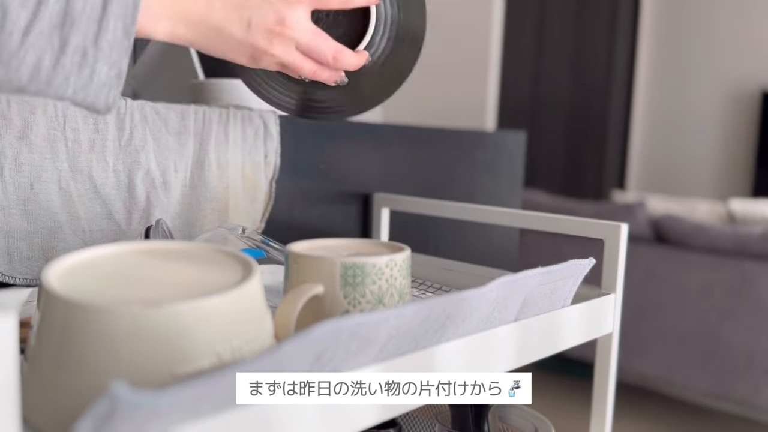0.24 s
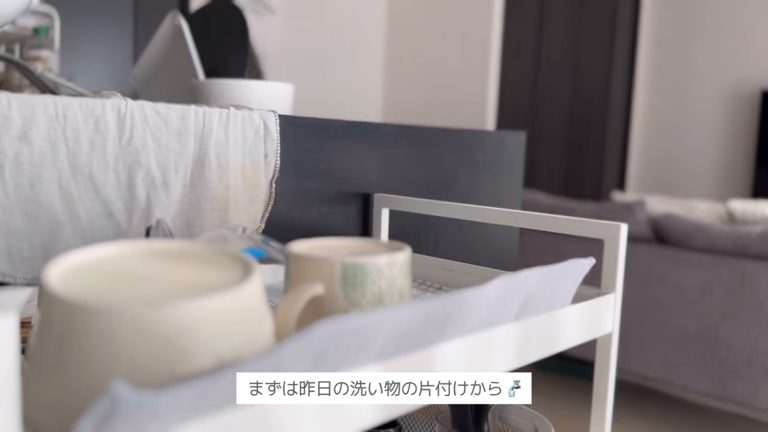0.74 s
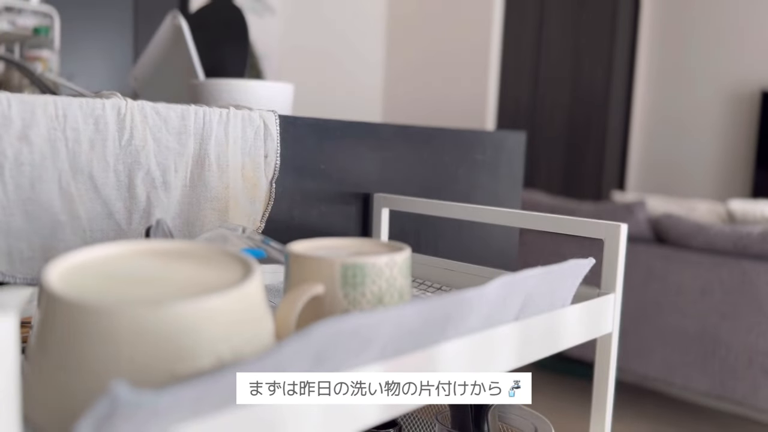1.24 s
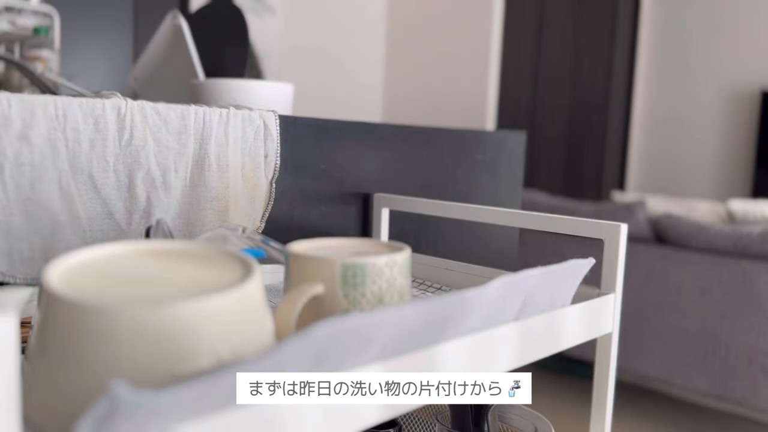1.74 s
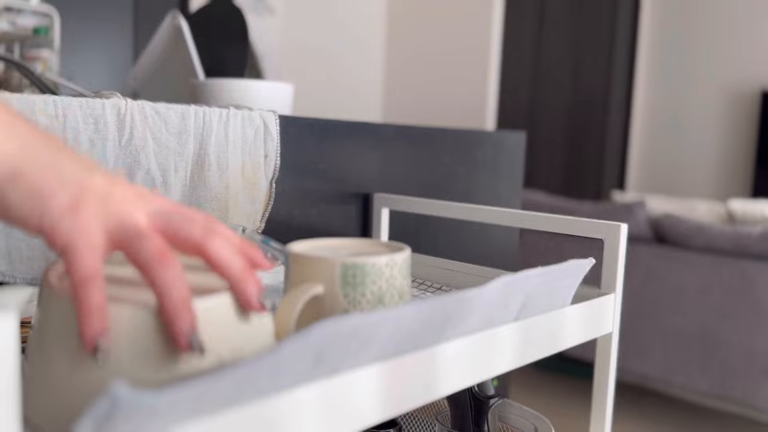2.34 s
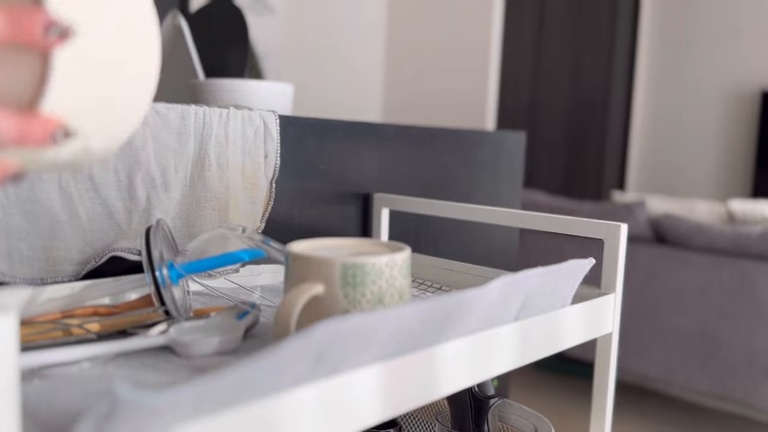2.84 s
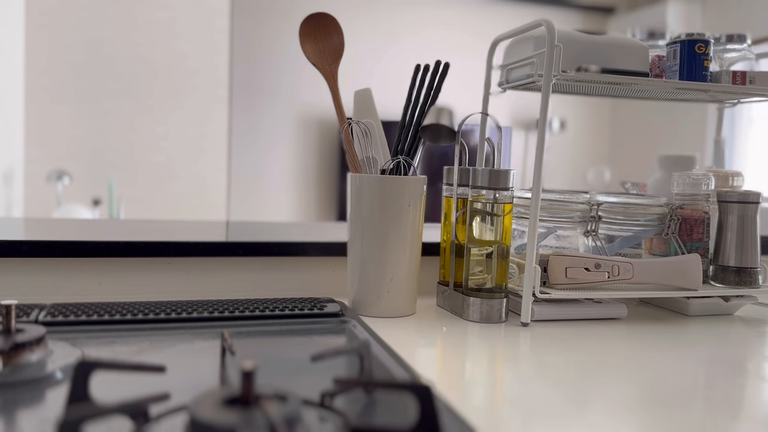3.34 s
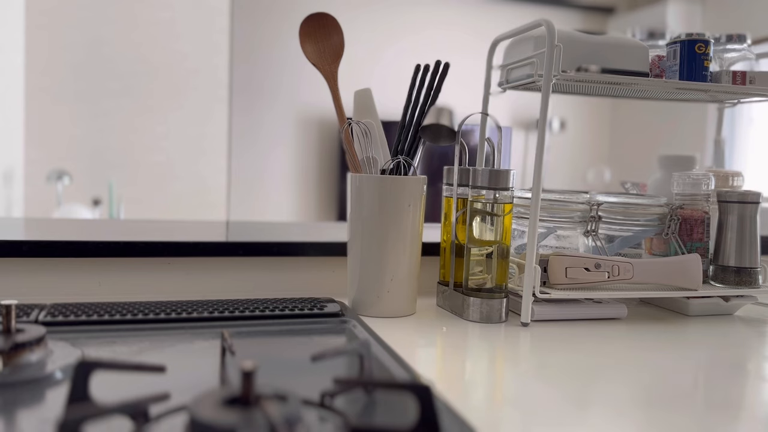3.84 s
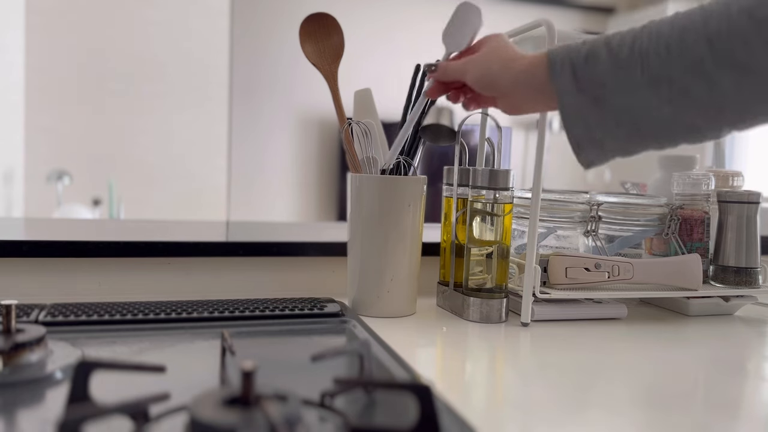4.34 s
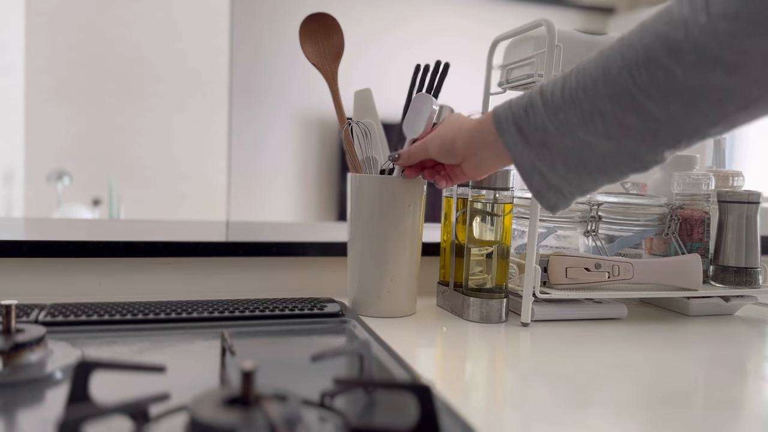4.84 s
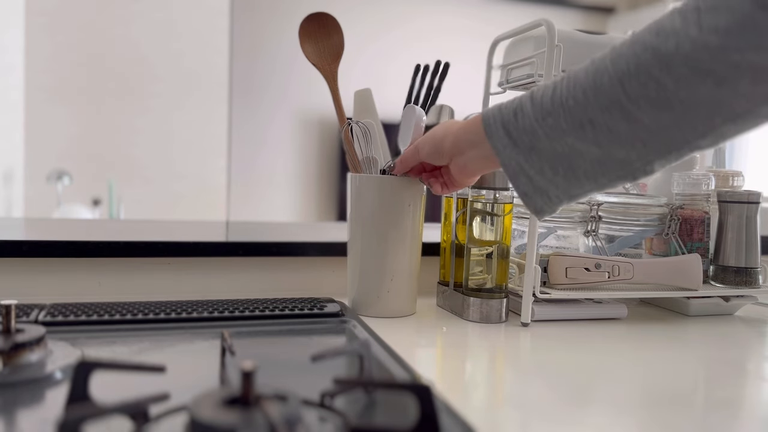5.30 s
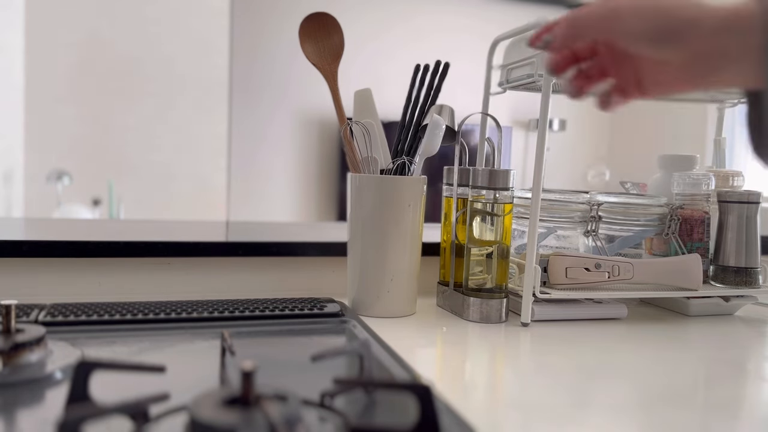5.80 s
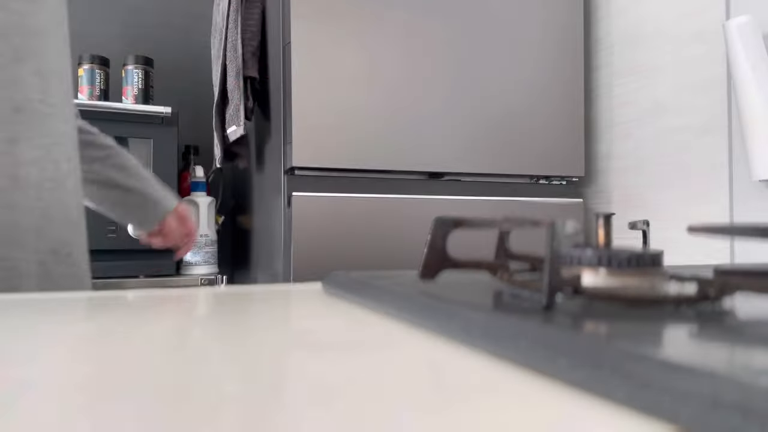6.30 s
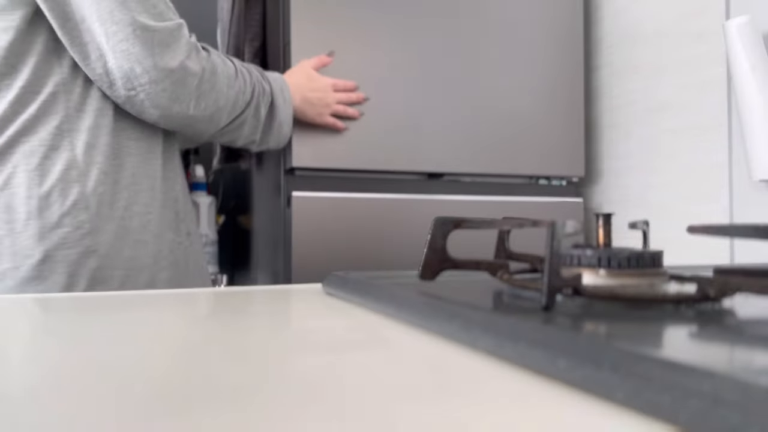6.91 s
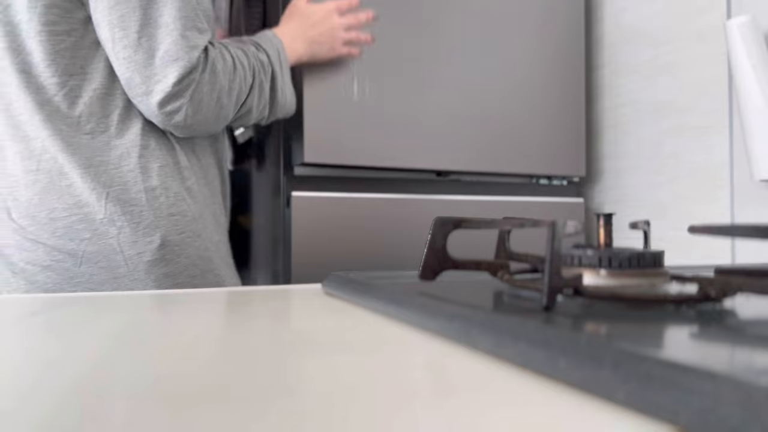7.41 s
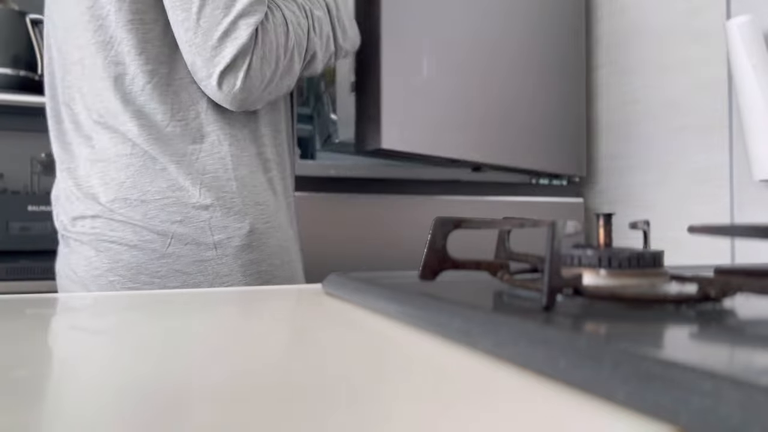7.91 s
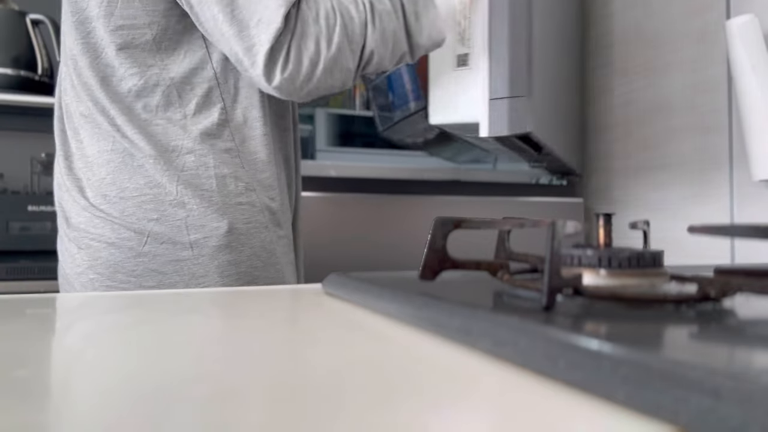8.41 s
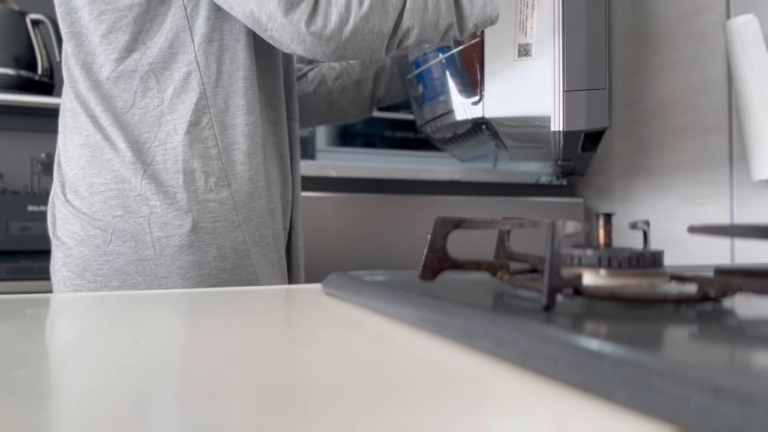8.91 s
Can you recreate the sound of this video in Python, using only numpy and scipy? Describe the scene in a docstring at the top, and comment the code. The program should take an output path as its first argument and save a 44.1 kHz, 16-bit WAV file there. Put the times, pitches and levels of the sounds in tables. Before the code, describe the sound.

A hard cabinet knock rattles stacked dishes in a bare kitchen, then a bowl lifts, cutlery clinks into a jar, and a fridge opens and is loaded.

```python
"""Washed dishes are put away in a bare, ringing kitchen: cabinet knocks across the room, a bowl lifted off a rack,
cutlery clinking into a ceramic jar, then a fridge pulled open and loaded, over the steady hum of the flat.
Blows are clicks that ring decaying modes and set off short noise bursts; slides are dense grit in several bands.
Both feed a noise-built room tail. Air pushes, hum, hiss, a whine and faint swishes are shaped noise."""
import sys
import numpy as np
from scipy import signal
from scipy.io import wavfile

SR = 44100
rng = np.random.default_rng(int(sys.argv[2]) if len(sys.argv) > 2 else 0)


def transcribe(u):
    """Save the signal u as a 16-bit wav file named by the first command-line argument.

    u: samples, shape (n,) or (channels, n), limited to [-1, 1]; the rate is SR.
    q: integer samples, one column per channel.
    """
    v = np.clip(np.atleast_2d(u).T, -1, 1)
    q = np.round(v * 32767).astype(np.int16)
    wavfile.write(sys.argv[1], SR, q)


N = 403515  # length in samples

# Bands of the noisy layers of knocks and slides: (low [Hz], high [Hz])
THUMP_HZ, WOOD_HZ, EDGE_HZ, TICK_HZ = (60, 330), (270, 1600), (1150, 4600), (4300, 15500)

# Resonances of thin panels and of wood: (frequency [Hz], level [dB], decay t60 [s])
PANEL_MODES = [(92.1, -10.5, 0.34), (142.5, 6.5, 0.11), (204.3, -3, 0.077), (261.7, -3, 0.2)]
WOOD_MODES = [(335.4, 6.8, 0.14), (497, 0.7, 0.1), (613, 5.9, 0.052), (791, 8.7, 0.034), (982, 3.7, 0.046),
              (1163, 2.8, 0.049), (1490, 5, 0.025)]
# Knocks on cabinet, rack, door seal and fridge: (time [s], wood level [dB], thump re wood [dB],
# edge re wood [dB], favoured wood pitch [Hz], left over right [dB])
CABINET_KNOCKS = [(1.073, -20.5, -10.5, -4.5, 1110, 1.6), (1.395, -40, -14.5, -6, 470, 2.5),
                  (1.659, -54, -9, -9, 640, 2.1), (1.949, -52, -13.5, -33, 855, 3.3),
                  (2.365, -51.5, -25, -15, 970, 3.1), (2.883, -47.5, 2, -13, 714, 1.3),
                  (6.803, -48.5, -4, -13, 1050, 1)]
RACK_KNOCKS = [(2.128, -50, -4, 2, 930, 8.5), (2.591, -43.5, 5.5, -0.5, 415, 3.5),
               (2.959, -52, -2, 3.5, 390, 11), (3.155, -54, 14.5, 1, 353, 3.5),
               (3.272, -40.5, -16, 3.5, 1450, -3), (3.329, -56, -3, 16, 1210, -0.5),
               (3.361, -60.5, -12, 18, 388, 4.5), (5.94, -49.5, -31, -9.5, 940, 2)]
SEAL_KNOCKS = [(7.125, -35, 10.4, -9.5, 526, -0.49), (7.256, -47, 2.4, -6.5, 805, 0.65),
               (7.3, -42.5, 12.4, -11.5, 1070, -1.6)]
FRIDGE_KNOCKS = [(7.357, -43, 10, -32, 400, -7), (7.421, -44, 4.5, -20, 437, 2),
                 (7.449, -42, 7.5, -34, 1140, -8), (7.667, -43.5, -11, -26, 536, 5),
                 (7.696, -47.5, 11.5, -12.5, 510, 5), (7.727, -51.5, 6, -20, 587, -1),
                 (8.312, -68, -21, -1, 1204, 1), (8.558, -41.5, -8, -36, 805, -2),
                 (8.644, -45.5, -5.5, -17, 943, -4), (8.776, -48, 0, -17, 580, -6),
                 (8.815, -26, -3.5, -22.5, 680, -4.5), (8.831, -35, 5, -20, 352, 4),
                 (8.924, -34, -0.5, -9, 740, -4), (8.959, -31.5, -5, -14, 1070, 1.5),
                 (9.066, -54.5, 10, -14, 775, 6), (9.133, -39, -31, -13.5, 1130, -2.5)]
# How each body is heard: (direct [dB], room [dB], tick re edge [dB], snap [dB])
ACROSS_ROOM, WIRE_RACK = (-4.5, 11.5, -9, -4), (0.1, 1.9, -2.5, -3)
RUBBER_SEAL, PLASTIC_SHELF = (-2.5, 0.7, -0.3, -1), (1.8, -2.5, -17.5, -10.5)


def fridge_rocking():
    """Something loose in the fridge door rocks at a steady beat, each knock weaker; returns knock rows."""
    start_s, every_s = 7.795, .1393
    level_db, loss_db = -51.5, 1  # first knock, drop per knock
    return [(start_s + k * every_s, level_db - k * loss_db, -6, -35, 584, 0) for k in range(6)]


def knocks():
    """A blow sets off panel thump, wood modes, a short snap, an edge crack and a bright tick.
    What reaches the walls comes from all sides of the body, so its modes blur into noise bands.
    Returns direct sound and room feed."""
    bodies = [(CABINET_KNOCKS, ACROSS_ROOM), (RACK_KNOCKS, WIRE_RACK), (SEAL_KNOCKS, RUBBER_SEAL),
              (FRIDGE_KNOCKS + fridge_rocking(), PLASTIC_SHELF)]
    rows = sorted(row + heard for body_rows, heard in bodies for row in body_rows)
    s, wood, thump, edge, wood_hz, pan, direct_db, room_db, tick, snap = np.transpose(rows)

    near = wood + direct_db
    panel_ring = ring(blows(s, near + thump - 6, pan / 2), PANEL_MODES)
    # the wood ring builds up over about a millisecond
    wood_ring = ring(blows(s, near + 1.0, pan), WOOD_MODES, favour_hz=wood_hz, falloff_db=12, rise_s=.0013)
    direct = soft(panel_ring, hz=394) + soft(wood_ring, hz=2500)
    direct += crack(blows(s, near + edge + 8, pan), EDGE_HZ, t60=0.064, channels=2)
    direct += crack(blows(s, near + edge + tick + 6, pan), TICK_HZ, t60=0.026)
    direct += crack(blows(s, near + snap, pan), (1300, 3400), t60=0.02)

    far = wood + room_db
    feed = crack(blows(s, far + thump + 19, pan / 2), THUMP_HZ, t60=0.13)
    feed += crack(blows(s, far + 12, pan), WOOD_HZ, t60=0.06, channels=2)
    feed += crack(blows(s, far + edge + 7, pan), EDGE_HZ, t60=0.059, channels=2)
    room_tick = crack(blows(s, far + edge + tick + 3, pan), TICK_HZ, t60=0.032)
    feed += signal.lfilter([1], [1, -.9], room_tick)  # ticks sound duller in the room tail
    return np.array([direct, feed])


# Resonances of the stacked dishes: (frequency [Hz], level [dB], decay t60 [s])
STACK_MODES = [(1335, 0, .2), (1675, -2, .2), (2259, -4, .12), (2722, -5, .12), (3840, -8, .15),
               (5090, -8, .12), (6350, -12, .15)]


def stack():
    """The first cabinet knock jolts the stacked dishes into ringing; returns direct sound and room feed."""
    first_s, pan_db = CABINET_KNOCKS[0][0], CABINET_KNOCKS[0][-1]
    rings = ring(blows(np.array([first_s]), -33.5, pan_db), STACK_MODES, rise_s=.003)
    return np.array([rings, rings])


# Touches on the bowl: (time [s], ring drive [dB], clack drive [dB], favoured pitch [Hz],
# fall-off away from it [dB per octave], left over right [dB])
BOWL_TOUCHES = [(2.4568, -53.5, -39, 10200, 18, 4.7)]
# Resonances of the bowl: (frequency [Hz], level [dB], decay t60 [s])
BOWL_MODES = [(4200, -3, .05), (6675, -2, .4), (10300, 0, .12), (13280, -2, .4), (14700, -3, .2)]


def bowl():
    """A touch rings the bowl's modes under a clack; returns direct sound and room feed."""
    return clinks(BOWL_TOUCHES, BOWL_MODES, clack_room_db=4.0, ring_room_db=-5)


# Resonances of the hand-held rim and of the rack's wires: (frequency [Hz], level [dB], decay t60 [s])
RIM_MODES = [(1185, 1, .06), (1890, -4, .02), (2815, 10, .45), (4900, -8, .03)]
WIRE_MODES = [(4250, -8, .03), (4720, -1, .02), (5250, -2, .012)]
SLIPS_PER_S = 900  # nominal rate of a dragged edge


def rub():
    """The rim sticks and slips in step with its own modes, so they sing; pressure on the rack stiffens the rim,
    so the pitches sag as it lifts. Later the bowl scrapes over the wires. Returns direct sound and room feed."""
    start_s = 2.516
    span = slice(int(start_s * SR), int((start_s + .5) * SR))
    drag = slips(start_s, length=.052, level_db=-49, fade_db=3)
    force = np.abs(drag[:, span]) * SR / SLIPS_PER_S
    # pressure builds to a peak, eases, then drops away
    pressed = np.interp(np.arange(N)[span] / SR, (2.518, 2.54, 2.553, 2.568), [0.5, 0.96, 0.67, 0.0089])
    stiffening_hz = 810  # added by the rack at pressure 1
    rings = np.zeros((2, N))
    for hz, db, t60 in RIM_MODES:
        r = decay(t60)
        pitch_hz = np.sqrt(hz ** 2 + stiffening_hz ** 2 * pressed)
        tone = np.sin(2 * np.pi * np.cumsum(pitch_hz) / SR)
        strength = signal.lfilter([1 - r], [1, -r], force * pressed)
        rings[:, span] += from_db(db) * tone * strength
    scrape = slips(start=3.008, length=0.17, level_db=-55, fade_db=26)
    rings += ring(scrape, WIRE_MODES, rise_s=0.00092)
    return np.array([rings, from_db(-8) * rings])


def slips(start, length, level_db, fade_db):
    """Uneven slips of a dragged edge, a little to the left, fading over the drag."""
    s = np.unique((start + length * rng.random(int(SLIPS_PER_S * length))).round(4))
    drive_db = level_db - fade_db * (s - start) / length + 3 * rng.standard_normal(len(s))
    return blows(s, drive_db, 3 + 0 * s) * rng.choice([-1, 1], N)


# Cutlery on the jar: (time [s], ring drive [dB], clack drive [dB], favoured pitch [Hz],
# fall-off away from it [dB per octave], left over right [dB])
JAR_CLINKS = [(4.4198, -29.5, -29, 3000, 5.5, 2), (4.4646, -33, -36, 4930, 10.5, 7.5),
              (4.6749, -49, -44, 4100, 27, 5.5), (4.7134, -29, -48, 2219, 264, 2),
              (4.7508, -59, -54, 13100, 51, 6), (5.019, -69, -64, 6390, 13, 9),
              (5.1347, -55, -53.5, 2670, 12, 8), (5.1832, -60, -73, 2300, 14, 4.5),
              (5.4121, -46.5, -42.5, 12550, 8, 5.5), (5.7066, -41, -27.5, 8500, 2, 4.5)]
# Resonances of the ceramic jar: (frequency [Hz], level [dB], decay t60 [s])
JAR_MODES = [(1560, -5, 0.022), (2220, -5.5, 0.061), (2283, 4, 0.052), (2500, -11, 0.044), (3237, 3, 0.043),
             (3594, -5.5, 0.022), (4180, -11.5, .04), (4810, -6.5, 0.022), (5540, -8, 0.16),
             (6170, 1.5, 0.05), (7990, -4.5, 0.17), (10100, -19, .03), (10105, -4.5, 0.03), (11390, 3, .06),
             (11800, -5, 0.06), (13170, -2, .06)]


def cutlery():
    """Cutlery strikes set the ceramic jar ringing; returns direct sound and room feed."""
    return clinks(JAR_CLINKS, JAR_MODES, clack_room_db=-1.5, ring_room_db=-12.0)


# A steel utensil drops in and bounces: (time [s], ring drive [dB], clack drive [dB], favoured pitch [Hz],
# fall-off away from it [dB per octave], left over right [dB])
STEEL_BOUNCES = [(5.7075, -35, -30.5, 4460, 5.8, 5.7), (5.745, -55, -70, 2150, 20, 4),
                 (5.766, -53, -70, 2150, 24, 4)]
# Resonances of the utensil: (frequency [Hz], level [dB], decay t60 [s])
STEEL_MODES = [(2153, -6, .025), (3316, -7, .15), (3924, -5, .03), (4172, -5, .03), (4985, 0, .04),
               (6557, -4, .04), (8317, -5, .07), (9889, -3, .04), (10710, -1, .03), (12820, -3, .04)]


def steel_utensil():
    """The drop and its bounces ring the utensil's own modes; returns direct sound and room feed."""
    return clinks(STEEL_BOUNCES, STEEL_MODES, clack_room_db=-2.0, ring_room_db=-8)


def clinks(rows, modes, clack_room_db, ring_room_db):
    """Each clink peaks over a few milliseconds and rings the modes around its favoured pitch,
    plus a dry clack with a dull body; returns direct sound and room feed."""
    # a click and a weaker one 4.6 ms later: ring 8 dB and clack 2.5 dB down
    weaker = np.array(rows) + [0.0046, -8, -2.5, 0, 0, 0]
    clicks = sorted(rows + list(map(tuple, weaker)))
    s, ring_db, clack_db, favour_hz, falloff_db, pan = np.transpose(clicks)
    clack = crack(blows(s, clack_db, pan), (1100, 11000), t60=0.012)
    clack += crack(blows(s, clack_db - 5.5, pan), WOOD_HZ, t60=0.021)  # dull body
    rings = ring(blows(s, ring_db, pan), modes, favour_hz=favour_hz, falloff_db=falloff_db, rise_s=0.00023)
    return np.array([clack + rings, from_db(clack_room_db) * clack + from_db(ring_room_db) * rings])


# Strokes of sliding on rack and fridge door:
# (start [s], hold [s], rumble level [dB], rasp level [dB], edge re rasp [dB])
SLIDE_STROKES = [(2.11, 0.18, -77, -57, 1.5), (2.556, 0.027, -70, -60.5, 5), (2.632, 0.36, -61, -68.5, 2),
                 (2.86, 0.085, -46, -76, -2), (2.956, 0.12, -52.5, -53, -2.5),
                 (3.134, 0.054, -45, -55.5, -7.5), (3.265, 0.11, -73, -49.5, -12),
                 (3.39, 0.026, -53, -47.5, -32), (6.781, 0.025, -42.5, -48, -11),
                 (7.113, 0.018, -30, -37, -13), (7.372, 0.025, -37, -53, -27),
                 (7.43, 0.13, -52, -56.5, -38), (7.628, 0.12, -43.5, -59, -23),
                 (8.88, 0.054, -45, -62, -20), (8.932, 0.012, -38, -39, -30)]


def slides():
    """Dense uneven grit under the stroke shakes panels and wood and rasps above them."""
    attack_s, release_db_per_s = 0.022, 207
    t, levels = np.arange(N) / SR, 0
    for start, hold, rumble_db, rasp_db, edge_db in SLIDE_STROKES:
        release = from_db(-release_db_per_s * np.maximum(t - start - hold, 0))
        shape = np.clip((t - start) / attack_s, 0, 1) * release
        tick_db = -13 + 3 * edge_db  # the top drops faster than the edge on a dull stroke
        layers_db = [rumble_db, rasp_db, rasp_db + edge_db, rasp_db + tick_db]
        levels = levels + np.outer(from_db(layers_db), shape)
    thump, wood, edge, tick = levels
    grains = rng.random((2, N)) < 1800 / SR  # about 1800 per second in each ear
    grit = grains * rng.standard_normal((2, N)) * from_db(3 * drift(25))
    rumble = soft(ring(grit[[0, 0]], PANEL_MODES, struck=False), hz=410.0)
    moving = thump * rms_one(rumble)
    moving += wood * rms_one(band(grit, *WOOD_HZ))
    moving += edge * rms_one(band(grit, *EDGE_HZ))
    return moving + tick * rms_one(band(grit, *TICK_HZ))


# Doors shove the air of the room: (time [s], drive level [dB])
DOOR_PUSHES = [(1.079, -8.5), (3.0, -23), (3.3, -19), (7.13, -7), (7.33, -7.5)]


def air_pushes():
    """Each shove of air is a deep puff of low noise that dies slowly."""
    s, level_db = np.transpose(DOOR_PUSHES)
    return crack(blows(s, level_db, 0 * s), (34, 72), t60=0.82)


# Reverb time of the kitchen: (frequency [Hz], decay t60 [s])
KITCHEN_T60 = [(60, 0.62), (250, 0.6), (1000, 0.51), (3000, 0.42), (8000, 0.46), (14000, 0.14)]


def kitchen(x):
    """Dense reflections that build up in under a millisecond and die band by band."""
    t = np.arange(SR) / SR
    tail = stereo_bands(SR, lambda hz: from_db(-60 * t / at_hz(KITCHEN_T60, hz)))
    tail *= 1 - np.exp(-t / 0.00022)
    tail /= np.sqrt(np.sum(tail ** 2) / 2)
    return signal.fftconvolve(x, tail, axes=1)[:, :N]


# Faint high swishes: (peak time [s], peak level [dB], rise [s], fall [s])
HIGH_SWISHES = [(4.383, -72.5, 0.88, 0.2), (5.945, -68.5, 0.12, 0.026), (8.146, -89.5, 0.32, 0.21)]


def swish_level():
    """Each swish rises and falls in a straight line in dB, silent outside."""
    t, depth_db, total = np.arange(N) / SR, 20.5, 0
    for s, db, rise, fall in HIGH_SWISHES:
        times, levels_db = [s - rise, s, s + fall], [db - depth_db, db, db - depth_db]
        total = total + from_db(np.interp(t, times, levels_db, -200, -200))
    return total


# Background by stretch of time:
# (from time [s], hum level [dB], deep rumble level [dB], air hiss level [dB], whine level [dB])
BACKGROUND_LEVELS = [(0, -58, -76, -83, -102), (3.201, -57.5, -63.5, -87, -94),
                     (4.6, -56, -61.5, -83, -91.5), (6.291, -51.5, -82.5, -87.5, -110.5),
                     (7.6, -52, -77, -87, -94)]
# Tone of the hum: (frequency [Hz], relative density [dB per Hz])
HUM_SPECTRUM = [(30, 3), (55, -1), (90, -8), (150, -1.5), (300, -5), (520, -7.5), (900, -13.5), (1600, -22),
                (2200, -48), (3000, -60), (4000, -58.5)]


def background():
    """Appliance and street hum, deep rumble, thin air hiss, a narrow whine near 7 kHz and passing swishes,
    all filtered noise; all but the swishes step in level at the start of each stretch."""
    since, *levels = np.transpose(BACKGROUND_LEVELS)
    stretch = np.searchsorted(since, np.arange(N) / SR, "right") - 1
    hum_db, deep_db, air_db, whine_db = np.array(levels)[:, stretch]
    hum = stereo_bands(N, lambda hz: from_db(at_hz(HUM_SPECTRUM, hz) + 1.3 * drift(4)) * (hz < 4000))
    mid, side = rng.standard_normal((2, N))
    white = mid + side * [[1], [-1]]
    air = band(signal.lfilter([1], [1, -.6], white), 4500, 14000)
    passing = swish_level()
    air_gain = from_db(air_db) + from_db(2.5) * passing  # swishes also have a broad part
    deep = from_db(deep_db) * rms_one(band(mid, 25, 100))
    swish = passing * rms_one(band(white, 9200, 12400))
    whine = from_db(whine_db + 1.5 * drift(12)) * rms_one(band(white, 6700, 7300))
    return from_db(hum_db) * rms_one(hum) + air_gain * rms_one(air) + whine + swish + deep


# Stereo width of tail and hum: (frequency [Hz], left-right likeness [-1 to 1])
STEREO_LIKENESS = [(40, 0.91), (125, 0.94), (250, 0.57), (500, 0.14), (2000, 0.055), (8000, 0.24),
                   (14000, 0.063)]


def stereo_bands(size, gain_at):
    """Half-octave bands of stereo noise, each with its own gain and left-right likeness."""
    out, edges = 0, 22 * 2 ** np.arange(0, 9.6, .5)
    white = rng.standard_normal((2, 2, size))
    for k, (low, high) in enumerate(zip(edges, edges[1:])):
        mid, side = band(white[k % 2], low, high)  # neighbouring bands use separate noise
        hz = np.sqrt(low * high)
        alike = np.clip(at_hz(STEREO_LIKENESS, hz), -1, 1)
        out = out + gain_at(hz) * (np.sqrt(1 + alike) * mid + np.sqrt(1 - alike) * side * [[1], [-1]])
    return out


def blows(s, level_db, pan_db):
    """A stereo click train."""
    out = np.zeros((2, N))
    out[:, (s * SR).astype(int)] = from_db(level_db + np.outer([.5, -.5], pan_db))
    return out


def ring(force, modes, struck=True, favour_hz=None, falloff_db=11, rise_s=0):
    """A force drives decaying sine modes. Strengths and signs vary from blow to blow, the spot that is hit may
    favour modes near one pitch, and the ring may take time to build up."""
    out, hit = np.zeros_like(force), np.flatnonzero(force.any(axis=0))
    span = slice(hit[0], hit[-1] + SR // 2)  # silence outside
    hit = hit - hit[0]
    spread_db = 1.8  # scatter of mode strengths between blows and between ears
    for hz, level_db, t60 in modes:
        r, w = decay(t60), 2 * np.pi * hz / SR
        pushed = force[:, span] + 1e-18
        if struck:
            scatter = from_db(spread_db * rng.standard_normal((2, len(hit))))
            pushed[:, hit] *= scatter * rng.choice([-1, 1], len(hit))
        if favour_hz is not None:
            pushed[:, hit] *= from_db(-falloff_db * np.abs(np.log2(hz / favour_hz)))
        if rise_s:
            q = np.exp(-1 / (rise_s * SR))
            build_up = [(1 - q * q) / 2, 0, (q * q - 1) / 2]
            pushed = signal.lfilter(build_up, [1, -2 * q * np.cos(w), q * q], pushed)
        gain = from_db(level_db) * np.sin(w)  # a unit click gives a sine of height 1 before the level
        out[:, span] += signal.lfilter([0, gain], [1, -2 * r * np.cos(w), r * r], pushed)
    return out


def crack(clicks, edges, t60, channels=1):
    """Each click becomes a swelling, then fading burst of noise in a band; shared by the ears or not."""
    swell_samples = 0.0022 * SR
    fade = signal.lfilter([1], [1, -decay(t60)], clicks + 1e-18)
    swell = signal.lfilter([1 / swell_samples], [1, 1 / swell_samples - 1], fade)
    return band(band(swell * rng.standard_normal((channels, N)), *edges), *edges)


def soft(x, hz):
    """A yielding contact: steep low-pass."""
    return signal.sosfilt(signal.butter(4, hz, fs=SR, output="sos"), x)


def band(x, low_hz, high_hz):
    """Band-pass."""
    return signal.sosfilt(signal.butter(2, [low_hz, high_hz], "band", fs=SR, output="sos"), x)


def drift(rate_hz):
    """Slow random wander, spread 1, made at a 40th of the sample rate."""
    r = np.exp(-80 * np.pi * rate_hz / SR)
    slow = signal.lfilter([1], [1, -2 * r, r * r], rng.standard_normal(N // 40 + 2002))[2000:]
    return np.interp(np.arange(N) / 40, np.arange(len(slow)), rms_one(slow))


def at_hz(points, hz):
    """Read a spectrum on a log-frequency axis."""
    points = np.array(points)
    return np.interp(np.log(hz), np.log(points[:, 0]), points[:, 1])


def from_db(db):
    """Decibels to gain."""
    return 10 ** (np.asarray(db) / 20)


def decay(t60):
    """Gain per sample of a fade that loses 60 dB in t60 seconds."""
    return from_db(-60 / (t60 * SR))


def rms_one(x):
    """Scale to rms 1."""
    return x / np.sqrt(np.mean(x ** 2) + 1e-20)


def scene():
    """Direct sounds, their room tail, air pushes and the background."""
    direct, feed = knocks() + stack() + bowl() + rub() + cutlery() + steel_utensil()
    moving = slides()
    room = kitchen(feed + from_db(-12.5) * moving)
    return direct + moving + room + air_pushes() + background()


def record(dry):
    """The microphone drops the deepest bass; the top is cut steeply."""
    thinned = signal.sosfilt(signal.butter(3, 36, "high", fs=SR, output="sos"), dry)
    return signal.sosfilt(signal.cheby2(14, 60, 16300, fs=SR, output="sos"), thinned)


dry = scene()
out = record(dry)
transcribe(out)
```